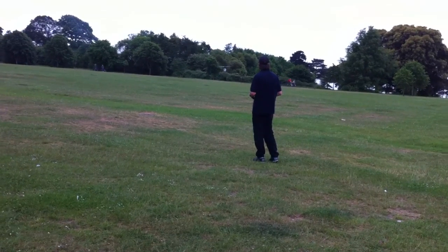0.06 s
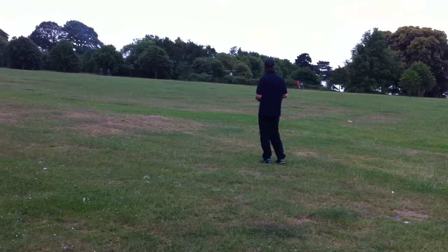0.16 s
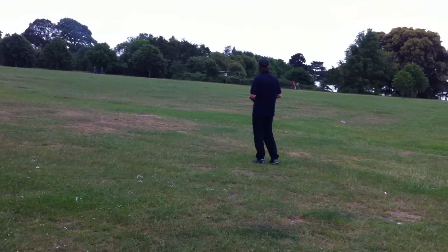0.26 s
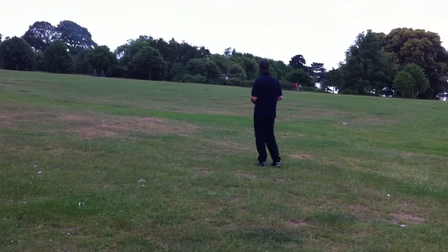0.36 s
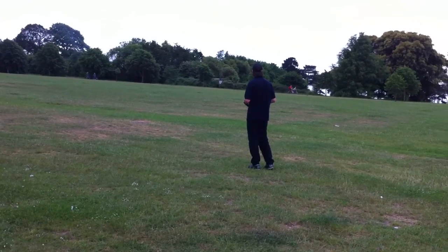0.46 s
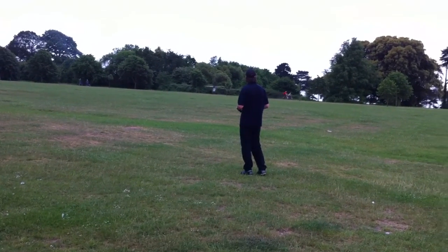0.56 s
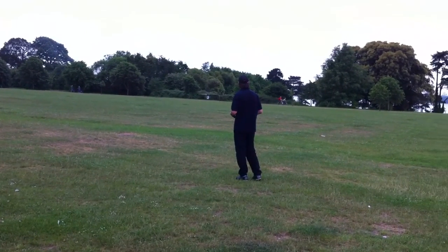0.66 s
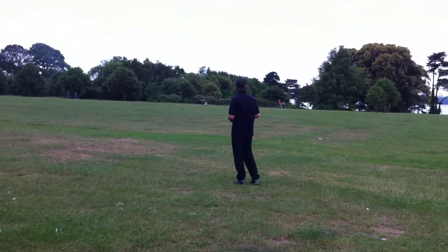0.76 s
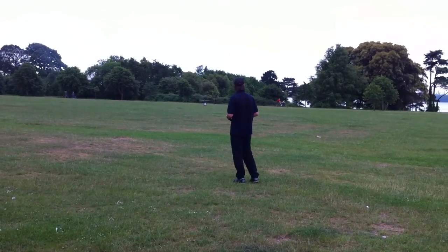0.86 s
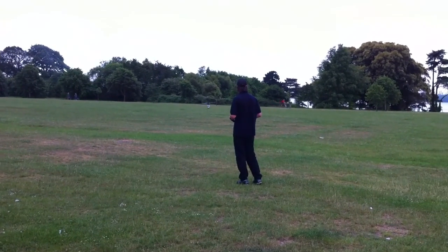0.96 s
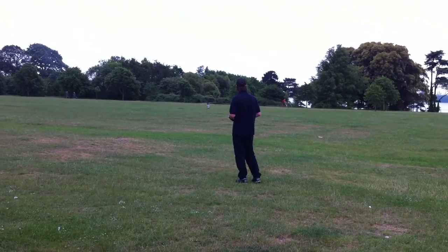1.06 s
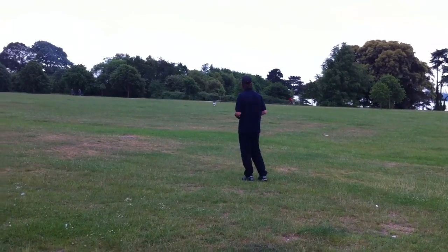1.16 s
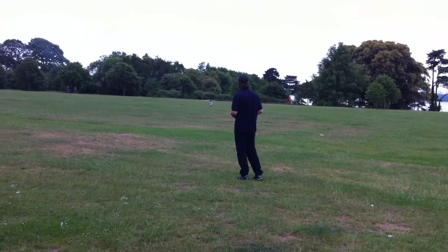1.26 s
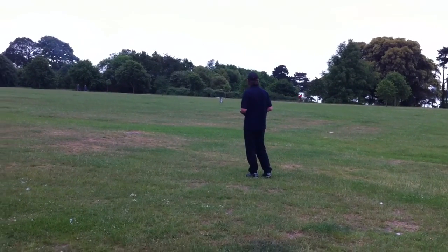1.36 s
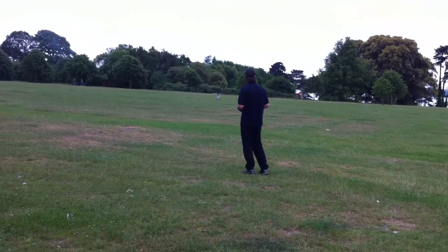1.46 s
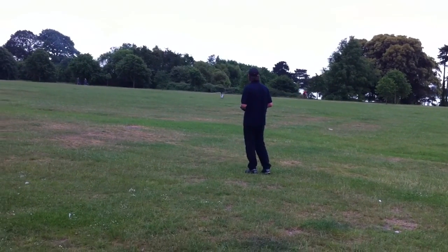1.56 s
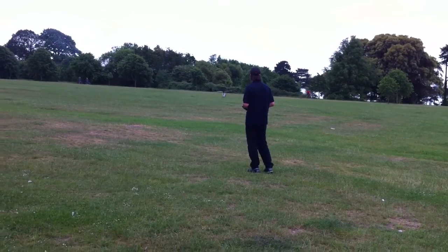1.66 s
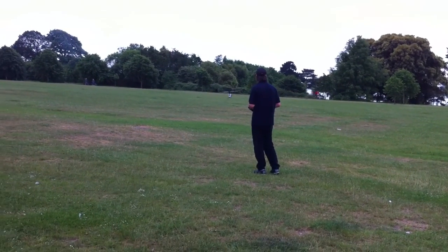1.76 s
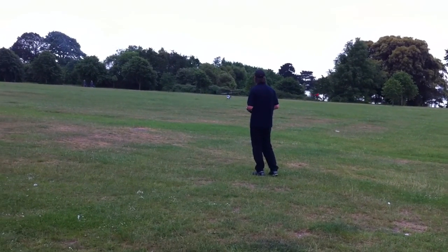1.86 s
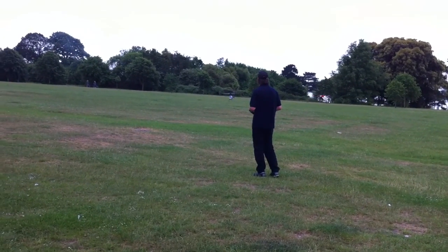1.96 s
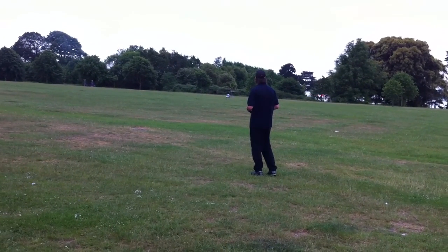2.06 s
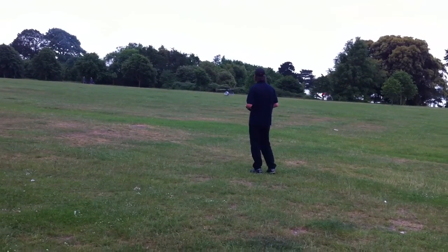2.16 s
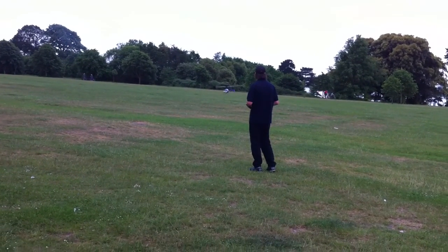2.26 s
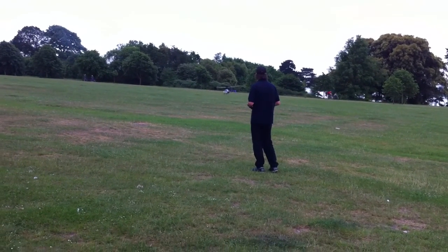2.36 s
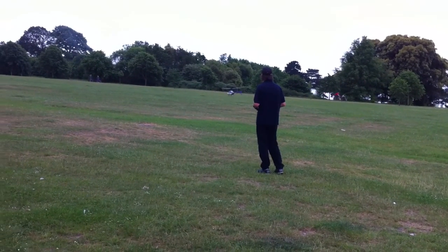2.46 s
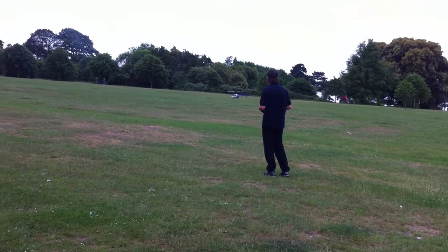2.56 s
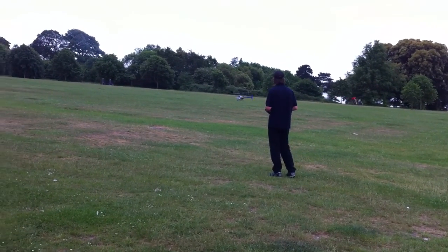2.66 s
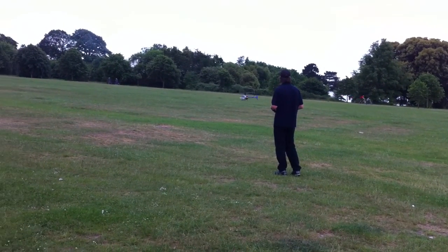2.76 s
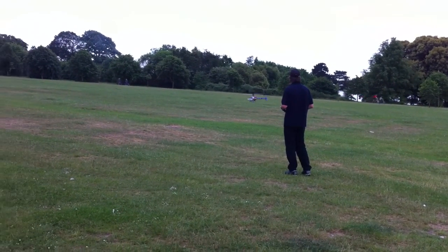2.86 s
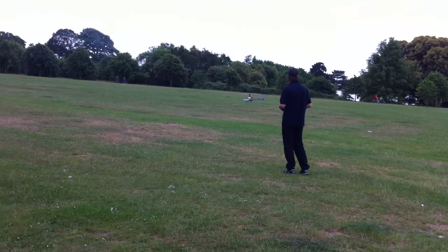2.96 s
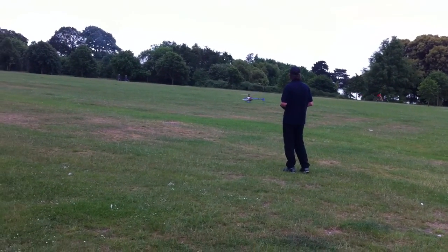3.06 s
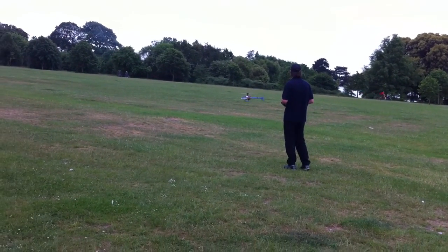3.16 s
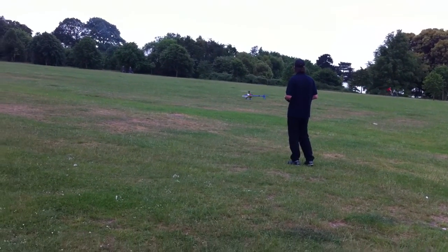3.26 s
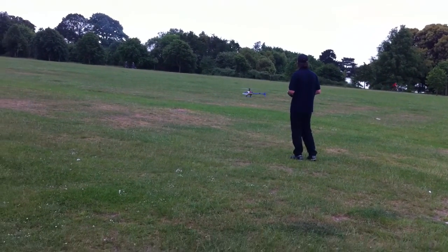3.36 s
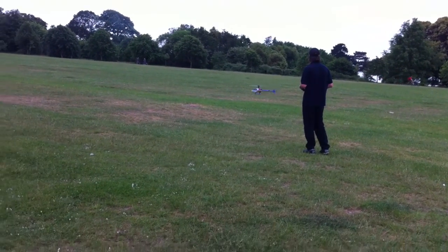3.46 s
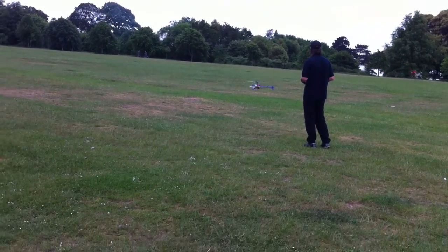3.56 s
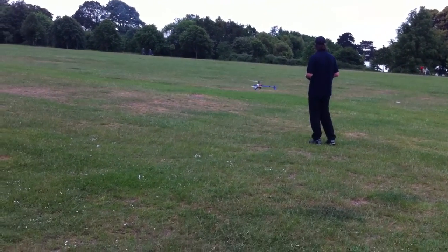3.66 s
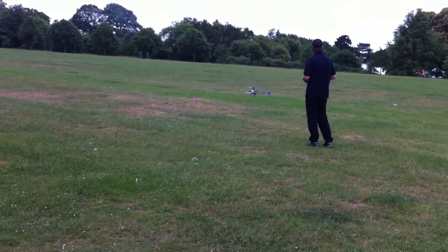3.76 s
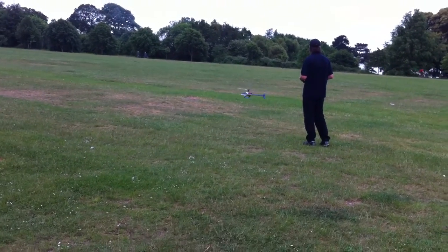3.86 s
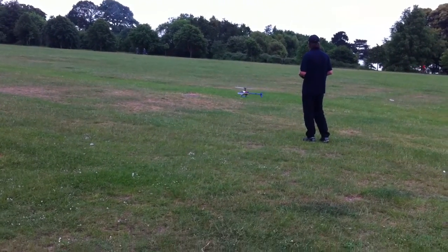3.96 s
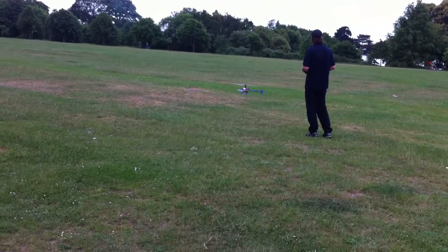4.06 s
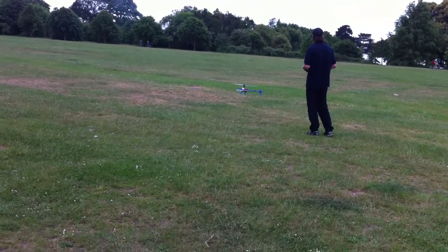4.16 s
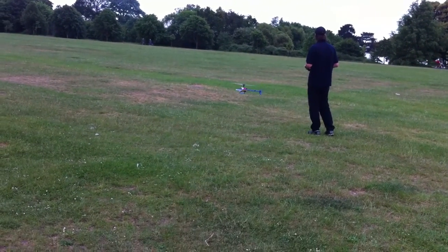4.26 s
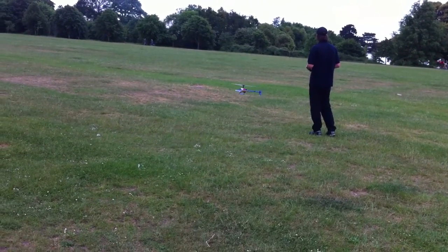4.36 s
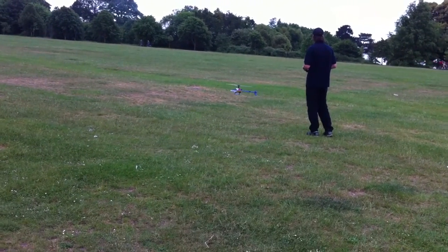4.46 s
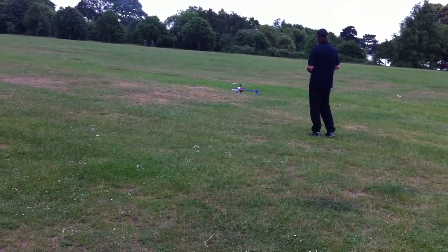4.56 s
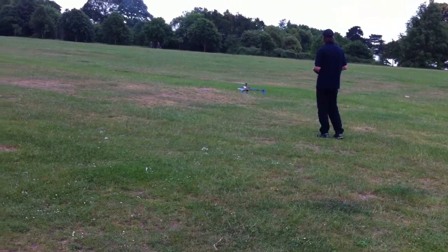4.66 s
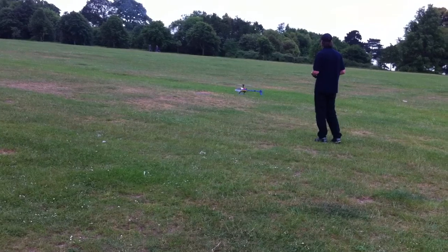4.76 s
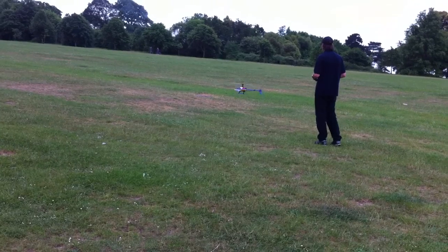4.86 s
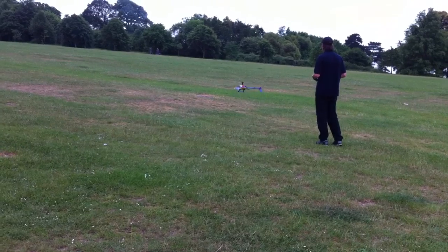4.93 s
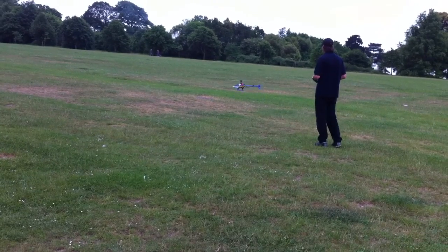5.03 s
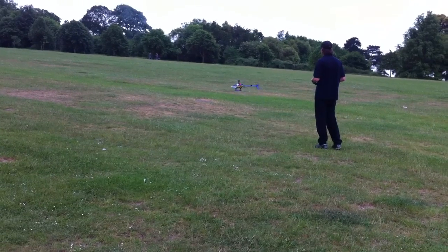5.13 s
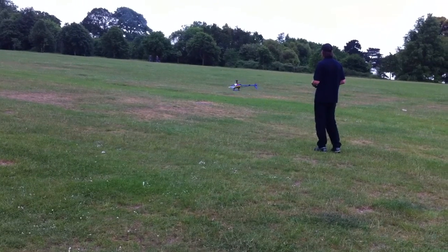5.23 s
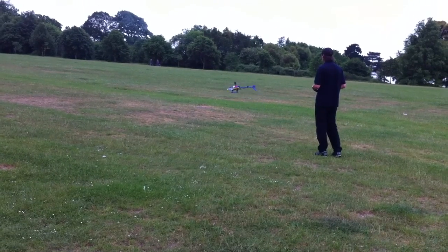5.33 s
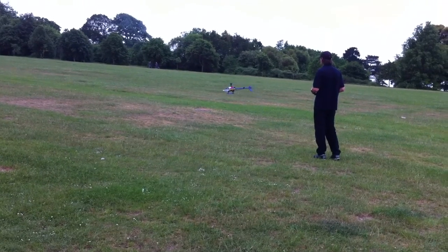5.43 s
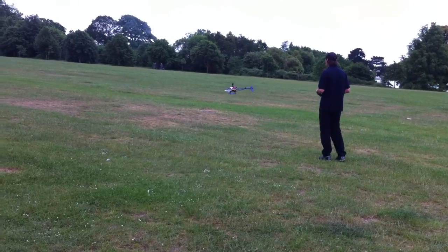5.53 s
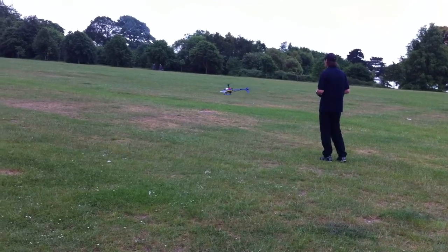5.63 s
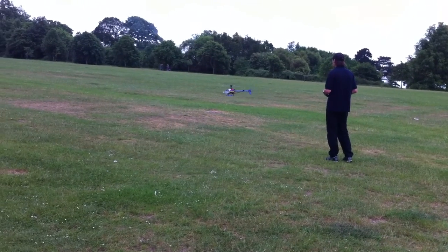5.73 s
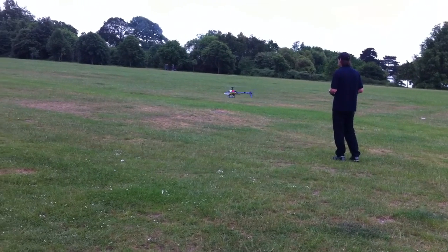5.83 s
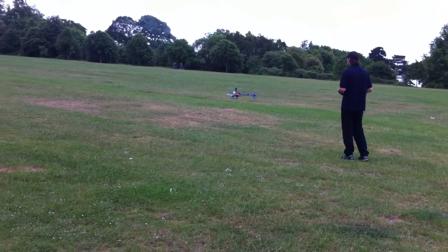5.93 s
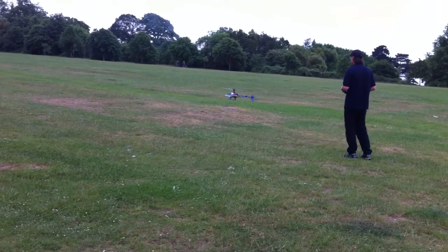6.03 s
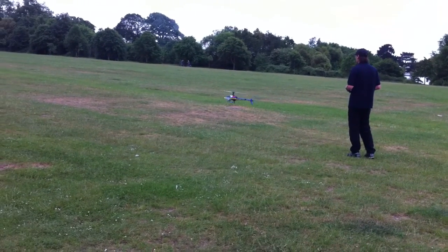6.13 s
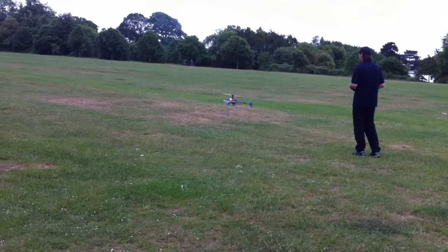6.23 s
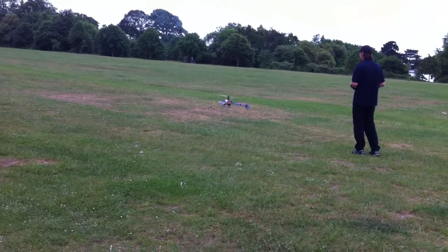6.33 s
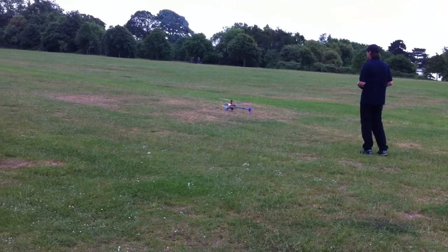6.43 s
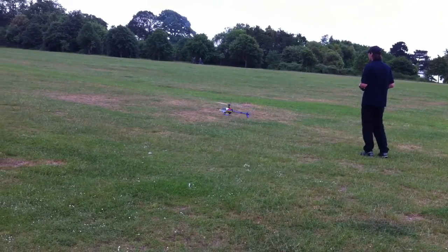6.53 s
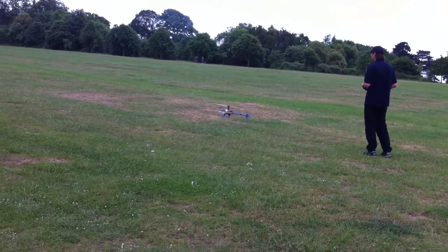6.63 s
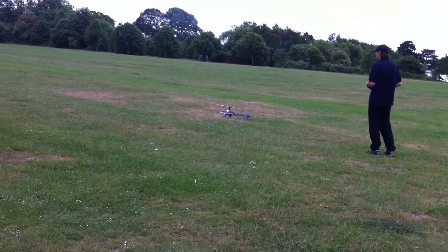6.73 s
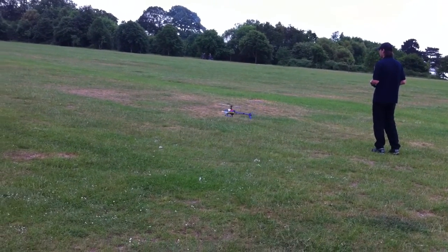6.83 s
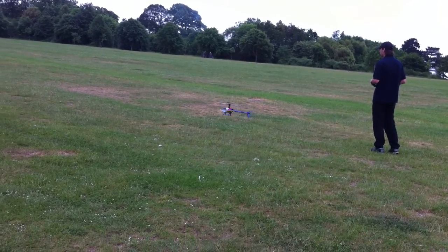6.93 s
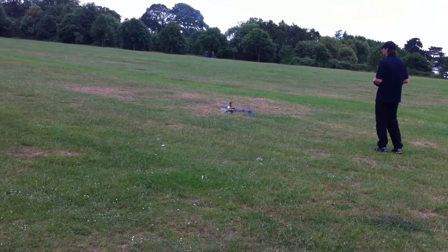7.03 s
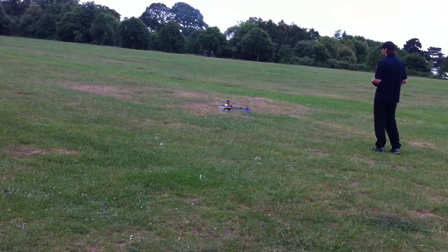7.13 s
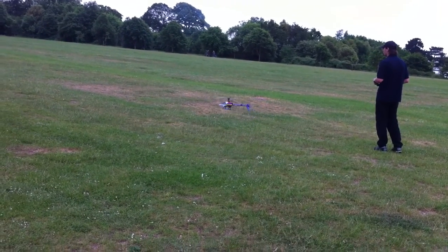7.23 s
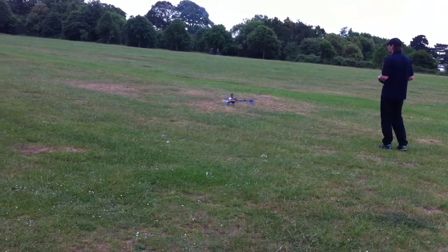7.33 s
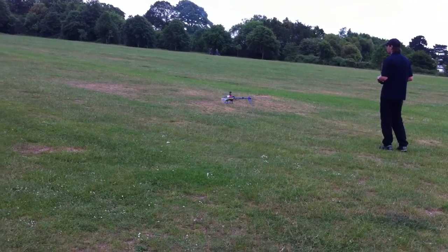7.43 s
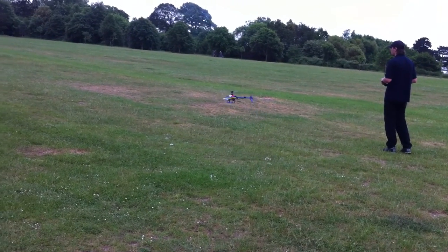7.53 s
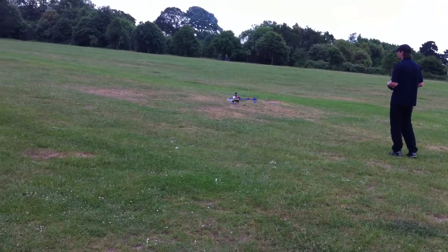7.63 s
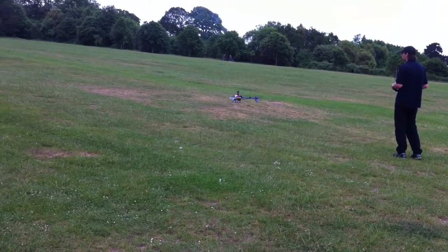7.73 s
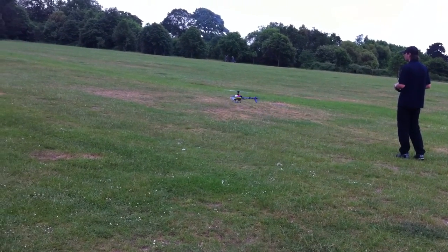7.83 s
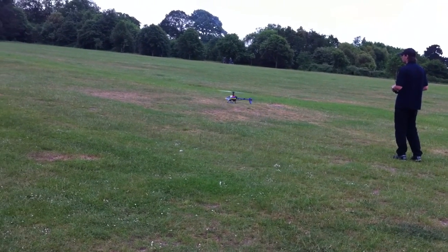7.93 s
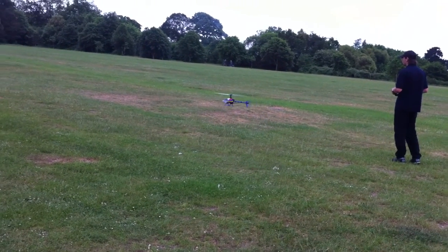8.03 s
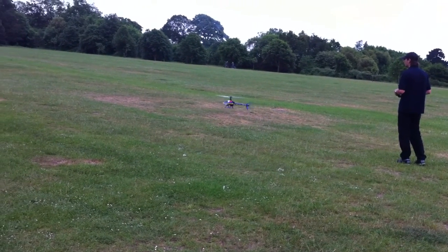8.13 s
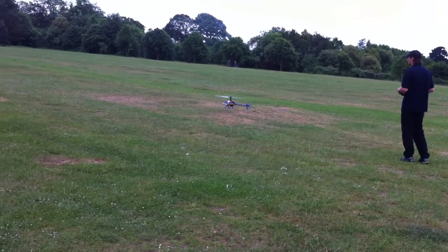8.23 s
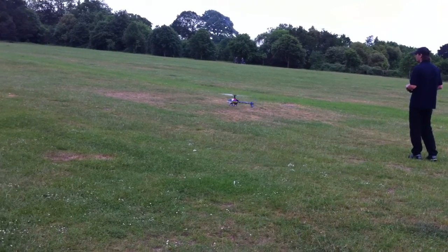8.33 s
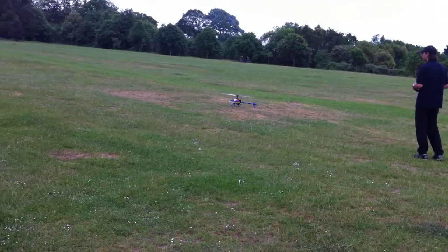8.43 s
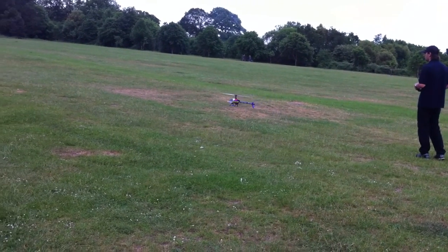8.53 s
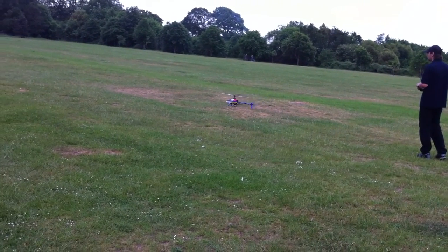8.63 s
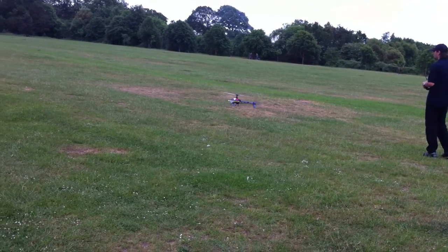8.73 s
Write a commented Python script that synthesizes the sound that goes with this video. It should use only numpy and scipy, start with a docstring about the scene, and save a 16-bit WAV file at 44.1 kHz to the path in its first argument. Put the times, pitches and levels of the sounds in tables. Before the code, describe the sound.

A small electric model helicopter hovers over grass with a high gear whine and swishing blades, growing louder as it drifts closer.

```python
"""Gear whine and swishing blade tips: an electric model helicopter hovers low over a lawn, drifting closer.
Gears and shafts are locked to the main rotor, so their tones are whole orders of its speed.
The tips whistle past twice a turn, over blade wash and hiss; the grass returns a short echo.
A far hum fills the park, a bird calls faintly and a breeze touches the microphone."""
import sys
import numpy as np
from scipy.fft import rfft, irfft, next_fast_len
from scipy.io import wavfile
from scipy.ndimage import map_coordinates

SR = 44100
rng = np.random.default_rng(int(sys.argv[2]) if len(sys.argv) > 2 else 0)


def digitize_waveform(pressure):
    """Quantize a signal to 16-bit integers and store it at the path in sys.argv[1].

    Rows of a 2-D input are taken as channels; values are limited to [-1, 1].
    """
    field = np.atleast_2d(pressure).T
    bounded = np.clip(field, -1, 1)
    quanta = np.round(bounded * 32767).astype(np.int16)
    wavfile.write(sys.argv[1], SR, quanta)


N = 387638

# main rotor (time [s], speed [turns/s])
ROTOR_SPEED = [(0.0, 40.5), (0.63, 40.354), (0.81, 40.471), (0.95, 40.764), (1.03, 40.918), (1.37, 41.112),
               (2.12, 41.088), (2.4, 40.525), (3.22, 39.959), (3.55, 40.214), (3.71, 40.29), (3.96, 40.816),
               (4.17, 40.872), (4.39, 41.233), (4.84, 41.309), (5.0, 41.056), (5.2, 40.623), (5.55, 40.21),
               (5.89, 39.634), (6.19, 39.887), (6.51, 40.499), (6.68, 40.675), (7.34, 40.775),
               (7.8, 40.644), (8.17, 40.102), (8.52, 40.309), (8.79, 40.248)]
# drift across the lawn (time [s], rotor angle where a blade sweeps toward the listener [turns])
APPROACH_ANGLE = [(0, -.07), (1.7, -.08), (3.6, -.28), (5.8, -.335), (6.5, -.29), (8, -.37), (8.79, -.33)]
# levels before trims (time [s], blade wash [dB], gear whir [dB], air hiss [dB], tip whistle [dB])
LAYER_LEVELS = [(0, -78, -73, -64.5, -52), (.5, -74.5, -69.5, -64.5, -51.5), (1, -72, -70, -62.5, -46.5),
                (1.6, -70, -68, -63, -46), (2.15, -78, -67, -61, -45), (2.5, -62.5, -63, -59, -44),
                (3.2, -56.5, -58.5, -55.5, -45.5), (3.8, -52, -58, -55.5, -42),
                (4.4, -53.5, -57, -55, -41.5), (5, -53.5, -58, -54.5, -40.5), (5.5, -52, -57, -52.5, -37.5),
                (6.2, -53, -56.5, -52.5, -43), (6.6, -51, -55, -53.5, -42.5), (7, -52.5, -54, -53.5, -40.5),
                (7.45, -52.5, -58, -53, -36.5), (7.85, -53, -54, -51.5, -39),
                (8.2, -54.5, -55.5, -52.5, -47.5), (8.79, -52, -55.5, -52.5, -43.5)]
# swish, shifting with tilt (time [s], depth [0-1], second blade re first [dB])
TIP_SWISH = [(0, 0.98, -2.5), (2, 0.92, -5), (3.8, 0.93, -5), (4.6, 0.89, -4.5), (5.4, 0.89, -4),
             (6.05, .9, -1), (7, 0.88, -8), (7.5, 0.93, -5.5), (7.9, 0.82, 0.5), (8.25, 0.5, 4),
             (8.79, 0.9, -3)]
# tip echo, sharp from afar at a grazing angle (time [s], strength [0-1])
TIP_ECHO = [(0, .4), (1.9, .4), (2.3, .2)]
# grass echo, following hover height (time [s], delay [ms])
ECHO_DELAY = [(0, .65), (.6, .6), (1, .51), (1.35, .49), (1.9, .55), (2.5, .62), (3, .59), (3.4, .51),
              (4.15, .24), (4.45, .17), (4.8, .245), (5.4, .545), (5.85, .64), (6.2, .5), (6.8, .21),
              (7.05, .17), (7.5, .28), (7.9, .41), (8.25, .42), (8.79, .3)]
# noise-shaping filters (frequency [Hz], relative gain [dB])
TIP_SPECTRUM = [(8000, -16), (11000, -24), (11900, -29), (12400, 2), (13200, -1), (14100, -0.5),
                (14900, -2), (15250, -4), (15700, -21), (16000, -36)]
WASH_SPECTRUM = [(250, -5.5), (500, -3), (900, -6.5), (1150, -1), (1700, 0.5), (2400, 2), (2550, -10),
                 (2750, -12.5), (3200, -7), (3600, -45)]
WHIR_SPECTRUM = [(2500, -46), (2800, -19), (3300, -4), (3900, 0.5), (4500, 1), (5300, -1.5), (5900, -4.5),
                 (6400, -56), (6900, -9)]
HISS_SPECTRUM = [(5800, -64), (6400, -14), (7000, -8.5), (8000, -3.5), (9300, -7.5), (10300, -0.5),
                 (11300, 1), (11900, -2.5), (12600, -37)]
HUM_SPECTRUM = [(20, -33), (65, -17), (85, -8), (160, 0), (230, -3), (320, -15.5), (700, -15), (1500, -13),
                (2800, -24), (5000, -7.5), (12000, -46.5)]
BREEZE_SPECTRUM = [(15, -23), (30, 4), (70, 2), (130, -8), (300, -36)]
# main tones (time [s], low drone [dB], motor shaft [dB], tail mesh [dB], main mesh [dB])
TONE_LEVELS = [(0.0, -68.5, -66.5, -65.5, -67), (0.6, -73.5, -65, -61.5, -63),
               (1.2, -71.0, -63, -66, -65.0), (1.8, -72, -62, -61, -66), (2.4, -76, -62.5, -51.5, -57.5),
               (2.9, -69, -66, -54, -62.5), (3.3, -62, -62.5, -73, -62.5), (3.8, -61, -59, -54.5, -56.5),
               (4.4, -61.5, -60.5, -56, -57.0), (5.0, -61.5, -59, -51.5, -57),
               (5.6, -60.5, -64.5, -48.5, -58), (6.0, -61.5, -66.5, -50.5, -57),
               (6.5, -58.5, -57.5, -46, -57.5), (7.0, -57.5, -61.5, -52, -56),
               (7.5, -57.5, -69, -49.5, -57.5), (8.0, -58, -60.5, -51, -54), (8.4, -57.5, -71, -48, -54.5),
               (8.79, -56.5, -66, -49, -56)]
# tone families, main tone first; speed slides them along frame resonances
# rotor order: (level re main tone [dB], slope [dB per turn/s])
LOW_DRONE_TONES = {5: (0, 0), 15: (-12, 4.2), 14: (-11.5, 8.2)}
MOTOR_SHAFT_TONES = {10: (0, 0), 19: (-16, 7), 20: (-11, -6), 28: (-14, -6)}
TAIL_MESH_TONES = {110: (0, 0), 109: (-27, 0), 111: (-12, -8), 112: (-20, 0), 116: (-11, 0)}
MAIN_MESH_TONES = {134: (0, 0), 128: (-2.5, 5), 140: (-5, -5.5), 146: (-10, -6), 280: (-11, 0)}
# tones in the wash, rotor order: (level re blade wash [dB], slope [dB per turn/s])
WASH_TONES = {40: (-15, -6), 30: (-15.5, 0), 42: (-13.5, 2), 56: (-11.5, 7.4), 105: (-11.5, 2.2),
              274: (-10, 2.7)}
# weak tones, parallel lists (rotor order [cycles/turn]), (level re gear whir [dB])
WEAK_TONE_ORDERS = (4, 27, 43, 50, 60, 84, 92, 98, 104, 115, 135, 262, 268, 286)
WEAK_TONE_DB = (-24, -37, -34, -22, -19, -20, -16.5, -11, -7, -12, -17, -12, -27, -42)
# bird call (start [s], length [s], first pitch [Hz], last pitch [Hz], glide [s], level [dB])
BIRD_NOTES = [(1.128, .12, 1910, 2100, 0.11, -72), (1.29, 0.23, 2500, 1990, .12, -76),
              (1.67, 0.066, 2050, 2500, 0.059, -74), (2.303, .22, 2090, 1990, .22, -75)]
# wind on the microphone (time [s], level [dB])
BREEZE_LEVEL = [(0, -88), (2, -88), (3.8, -78), (5.4, -80), (6.4, -84), (7, -74), (7.8, -80), (8.3, -91),
                (8.79, -89)]

BODY_ECHO, HISS_ECHO, TONE_ECHO = 0.29, 0.16, 0.31  # gain re direct sound
TIP_EXTRA_DELAY_MS = 0.157  # tips ride higher than the body
TURF_LAG_RAD = 1.7
FADE_DB, FADE_RATE_HZ = 3, 3.02
BAND_LIMIT_HZ = 15850


def amp(db):
    """Decibels to gain."""
    return 10 ** (np.asarray(db) / 20)


def unit(x):
    """x at rms 1."""
    return x / np.sqrt(np.mean(x ** 2) + 1e-20)


def curves(rows):
    """One value per sample for each column after the time."""
    times_s, *columns = np.transpose(rows)
    return [np.interp(np.arange(N) / SR, times_s, column) for column in columns]


def wobble(rate_hz):
    """Smooth random curve, rate_hz knots a second."""
    knots = rng.standard_normal(int(N * rate_hz / SR) + 4)
    return map_coordinates(knots, [np.arange(N) * rate_hz / SR])


def filtered(x, response):
    """x through a frequency response."""
    size = next_fast_len(N + SR // 4)
    return irfft(rfft(x, size) * response(np.fft.rfftfreq(size, 1 / SR)), size)[:N]


def coloured(x, spectrum):
    """x shaped by a spectrum on a log frequency axis, at rms 1."""
    knots_hz, db = np.transpose(spectrum)
    return unit(filtered(x, lambda hz: amp(np.interp(np.log(hz + 1), np.log(knots_hz), db, -120, -120))))


def rotor_noise(turns, repeat_gain, renew_hz=1.6, size=4096, order_count=300):
    """Tooth and blade errors repeat each turn: a slowly renewed one-turn pattern plus fresh noise."""
    shape = (int(N * renew_hz / SR) + 3, order_count)
    orders = rng.standard_normal(shape) + 1j * rng.standard_normal(shape)
    patterns = irfft(orders * amp(rng.normal(0, 2, shape)), size + 1)
    repeating = map_coordinates(patterns, [np.arange(N) * renew_hz / SR, turns % 1 * size], order=1)
    return repeat_gain * unit(repeating) + rng.standard_normal(N)


def blade_tip(angle_turns, rest_hz, width_hz, beaming, mach=0.36):
    """A circling tip sheds a fuzzy whistle, higher and louder as it sweeps toward the listener."""
    doppler = 1 / (1 - mach * np.cos(2 * np.pi * angle_turns))
    fuzz = wobble(width_hz) + 1j * wobble(width_hz)
    phase_rad = 2 * np.pi * np.cumsum(rest_hz * doppler) / SR
    return doppler ** beaming * np.real(fuzz * np.exp(1j * phase_rad))


def tip_swish(angle_turns, level_db):
    """Two tips half a turn apart, blended with steady noise in the same band."""
    depth, second_db = curves(TIP_SWISH)
    first = blade_tip(angle_turns + 0.5, rest_hz=9150, width_hz=1600, beaming=4.37)
    second = blade_tip(angle_turns, rest_hz=9340, width_hz=1900, beaming=4.33) * amp(second_db)
    swish = coloured(first + second, TIP_SPECTRUM) * amp(1.3 * wobble(80))  # no two passes alike
    steady = coloured(rng.standard_normal(N), TIP_SPECTRUM)
    return amp(level_db) * (depth * unit(swish) + np.sqrt(1 - depth ** 2) * steady)


def body_whir(turns, wash_db, whir_db):
    """Broad noise of blades and gears, partly repeating each turn."""
    wash = coloured(rotor_noise(turns, repeat_gain=0.42), WASH_SPECTRUM)
    whir = coloured(rotor_noise(turns, repeat_gain=0.6), WHIR_SPECTRUM)
    return amp(wash_db - 2) * wash + amp(whir_db + 6.5) * whir


def air_hiss(turns, angle_turns, level_db):
    """Air hiss, pulsing unevenly twice a turn."""
    pulse = 1 + 0.13 * np.cos(4 * np.pi * angle_turns) - 0.11 * np.cos(2 * np.pi * angle_turns)
    return amp(level_db + 4) * coloured(rotor_noise(turns, repeat_gain=0.29) * pulse, HISS_SPECTRUM)


def order_tone(turns, order, level_db, flutter_db):
    """Sine locked to the rotor, its level fluttering."""
    peak = np.sqrt(2) * amp(level_db + flutter_db * wobble(14))
    return peak * np.sin(2 * np.pi * (order * turns + rng.random()))


def gear_whine(turns, speed_hz, wash_db, whir_db):
    """Low drone, motor and mesh tones; directional companions fade at random as the machine sways."""
    families = (LOW_DRONE_TONES, MOTOR_SHAFT_TONES, TAIL_MESH_TONES, MAIN_MESH_TONES, WASH_TONES)
    excess_hz = speed_hz - speed_hz.mean()
    whine = np.zeros(N)
    for family, family_db in zip(families, (*curves(TONE_LEVELS), wash_db)):
        for index, (order, (offset_db, db_per_hz)) in enumerate(family.items()):
            fade_db = (index > 0) * FADE_DB * wobble(FADE_RATE_HZ)
            level_db = family_db + offset_db + db_per_hz * excess_hz + fade_db
            whine += order_tone(turns, order, level_db, flutter_db=1.06)
    for order, offset_db in zip(WEAK_TONE_ORDERS, WEAK_TONE_DB):
        whine += order_tone(turns, order, whir_db + offset_db + 1.1 * wobble(1.6), flutter_db=4)
    return whine


def fan_fuzz(turns, wash_db, motor_order=10):
    """Turbulent air through the cooling fan smears a band around each motor harmonic."""
    _, motor_db, _, _ = curves(TONE_LEVELS)
    levels_db = [motor_db - 7.5] + [wash_db + db for db in (-12.5, -15.5, -8.5, -6, -7.5)]
    return sum(amp(db) * wobble(160) * np.sin(2 * np.pi * motor_order * harmonic * turns)
               for harmonic, db in enumerate(levels_db, 1))


def tail_rasp(turns, mesh_order=110):
    """Tail gear teeth never meet twice alike: a noise band around the mesh tone."""
    _, _, mesh_db, _ = curves(TONE_LEVELS)
    return amp(mesh_db - 8) * wobble(450) * np.sin(2 * np.pi * mesh_order * turns)


def with_grass_echo(x, strength, extra_ms=0):
    """x plus one late copy off the lawn, its phase turned by the soft turf."""
    delay_ms = curves(ECHO_DELAY)[0] + extra_ms
    turned = filtered(x, lambda hz: np.exp(-1j * TURF_LAG_RAD))
    echo = map_coordinates(turned, [np.arange(N) - delay_ms * SR / 1000], order=3, mode="nearest")
    return (x + strength * echo) / np.sqrt(1 + strength ** 2)


def park_hum():
    """Far hum, swelling slightly."""
    level_db = -59.5 + 0.41 * wobble(1.95) + 1.6 * wobble(3.7)
    return amp(level_db) * coloured(rng.standard_normal(N), HUM_SPECTRUM)


def bird(ramp_s=0.018):
    """Faint notes that glide, then hold."""
    call, time_s = np.zeros(N), np.arange(N) / SR
    for start_s, length_s, first_hz, last_hz, glide_s, level_db in BIRD_NOTES:
        pitch_hz = np.interp(time_s, [start_s, start_s + glide_s], [first_hz, last_hz])
        gate = np.clip(np.minimum(time_s - start_s, start_s + length_s - time_s) / ramp_s, 0, 1)
        call += np.sqrt(2) * gate * amp(level_db) * np.sin(2 * np.pi * np.cumsum(pitch_hz) / SR)
    return call


def breeze():
    """Light wind rumbles on the microphone."""
    level_db = curves(BREEZE_LEVEL)[0] + 2.1 * wobble(9.8)
    return amp(level_db) * coloured(rng.standard_normal(N), BREEZE_SPECTRUM)


def scene():
    """Helicopter over grass, plus bird, park and wind; mono."""
    speed_hz = curves(ROTOR_SPEED)[0]
    turns = np.cumsum(speed_hz) / SR
    angle_turns = turns - curves(APPROACH_ANGLE)[0]
    wash_db, whir_db, hiss_db, tip_db = curves(LAYER_LEVELS)
    tones = gear_whine(turns, speed_hz, wash_db, whir_db) + fan_fuzz(turns, wash_db) + tail_rasp(turns)
    helicopter = with_grass_echo(tones, TONE_ECHO)
    helicopter += with_grass_echo(body_whir(turns, wash_db, whir_db), BODY_ECHO)
    helicopter += with_grass_echo(air_hiss(turns, angle_turns, hiss_db), HISS_ECHO)
    helicopter += with_grass_echo(tip_swish(angle_turns, tip_db), curves(TIP_ECHO)[0], TIP_EXTRA_DELAY_MS)
    return (helicopter + bird() + park_hum() + breeze())[None]


def record(dry):
    """Brick-wall low-pass at the band limit."""
    return filtered(dry[0], lambda hz: hz < BAND_LIMIT_HZ)[None]


dry = scene()
out = record(dry)
digitize_waveform(out)
```